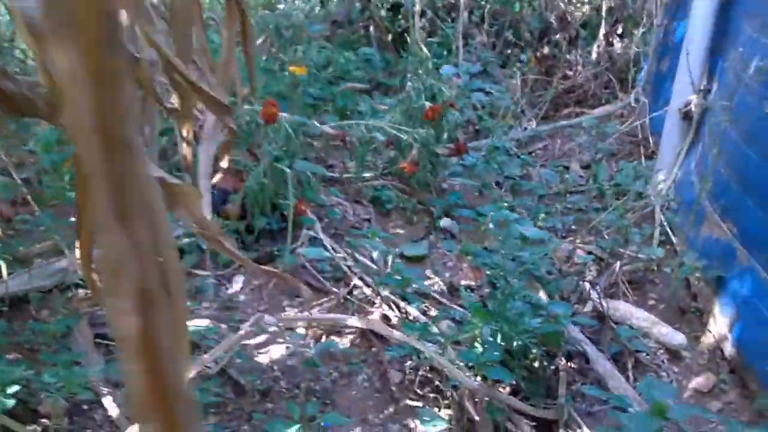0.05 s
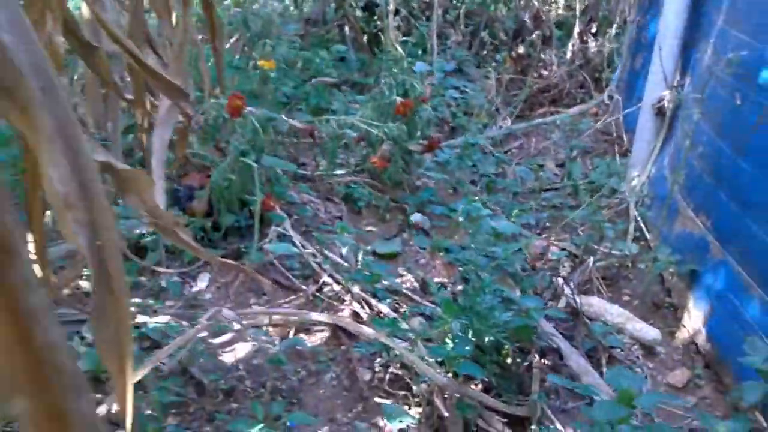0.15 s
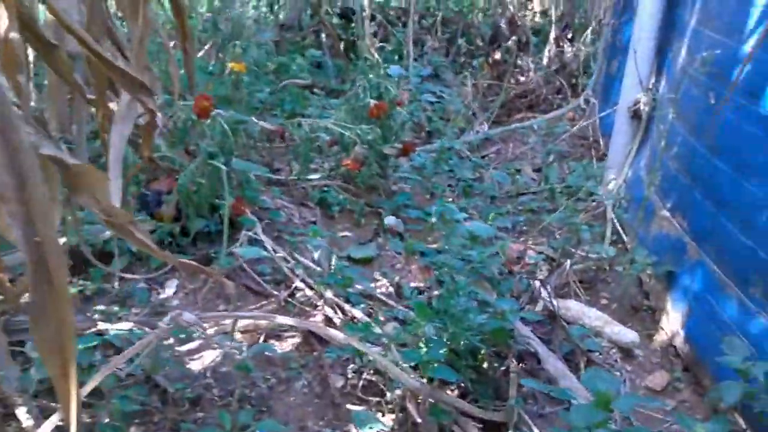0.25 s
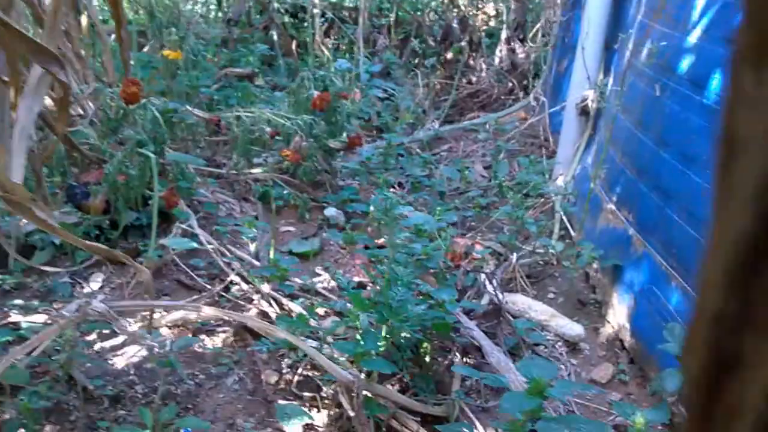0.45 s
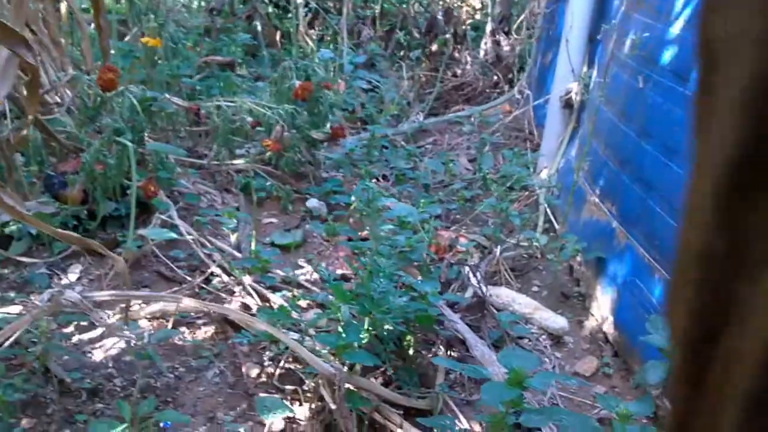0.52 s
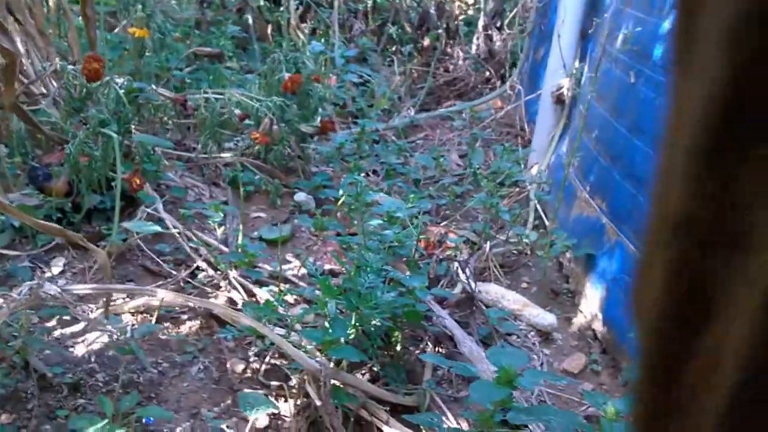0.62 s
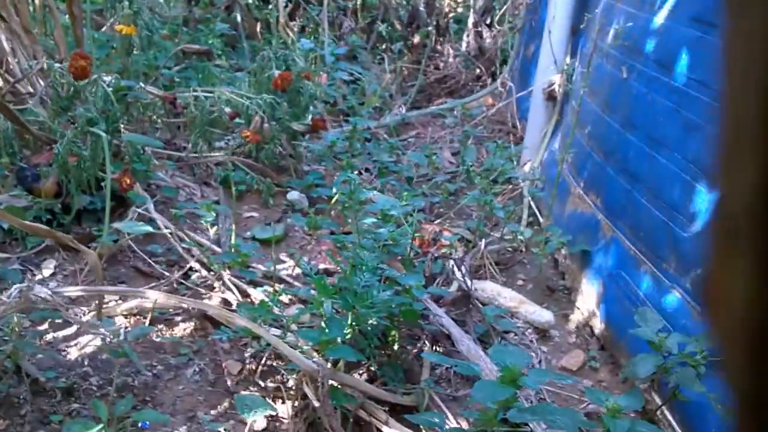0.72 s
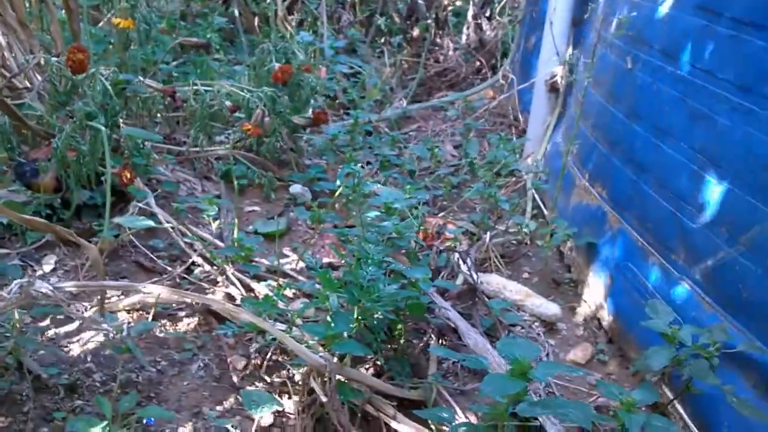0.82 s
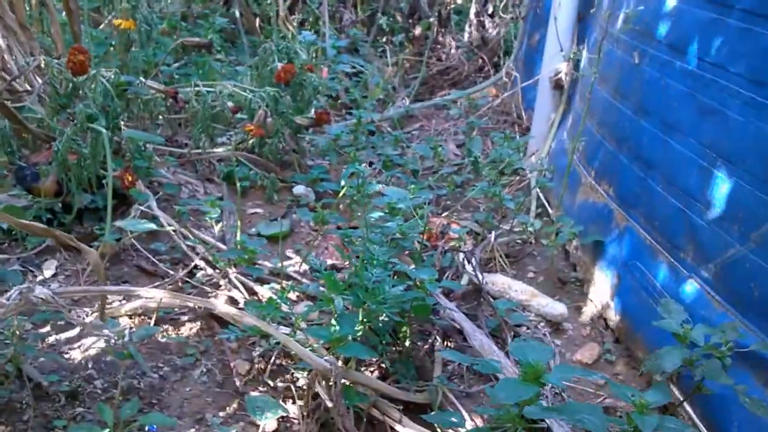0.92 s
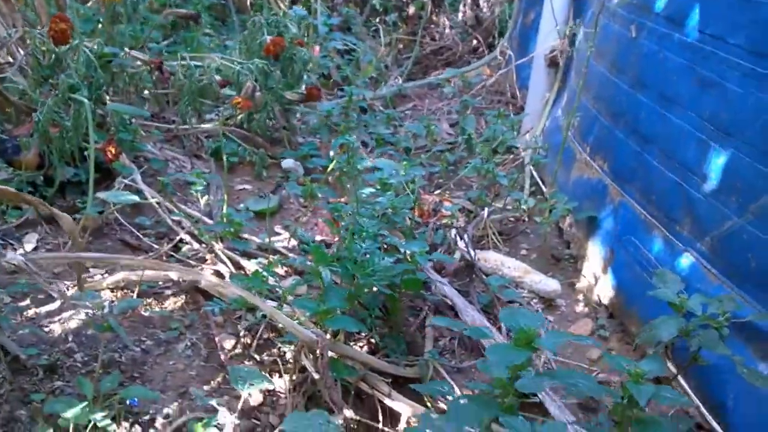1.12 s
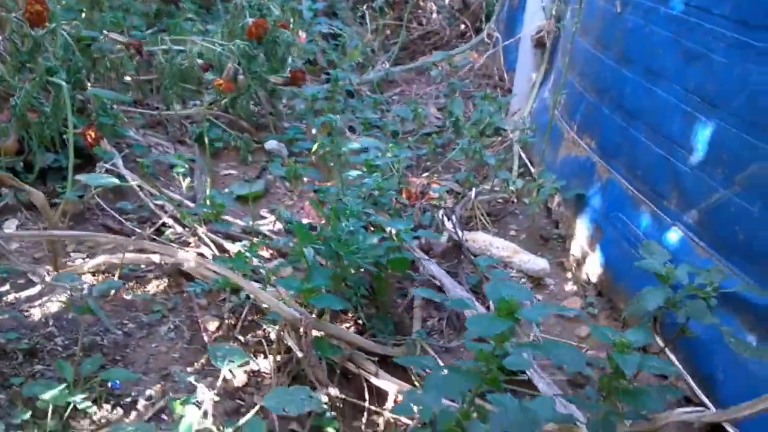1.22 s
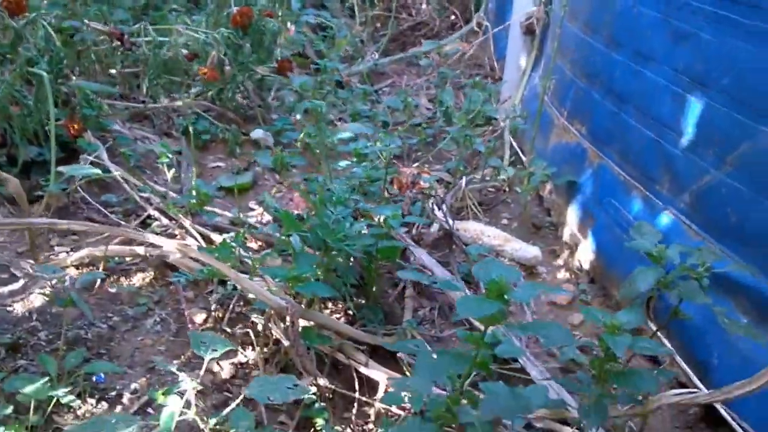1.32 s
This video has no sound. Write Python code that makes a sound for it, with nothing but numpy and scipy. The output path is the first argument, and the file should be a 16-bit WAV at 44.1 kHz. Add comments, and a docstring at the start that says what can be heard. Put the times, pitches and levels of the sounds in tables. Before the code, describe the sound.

A dry corn stalk snaps close by in a garden. Faint rustle, far hush and low wind come first; at 0.2 seconds a sharp, bright crack bursts out with a short tearing hiss, hollow thump and fading splinters. Light leaf crackles follow from 0.27, thicken into a dense cluster around 0.65-1.0 with a soft bump near 0.8, then grow sparse until the end at 1.35. Dry, close, mono.

```python
"""Corn stalk snapping in a garden

A dry corn stalk snaps close by, with a hollow thump, as someone pushes through a garden.
Brittle leaves crackle, mostly in clusters after the snap, over a soft rustle, a far hush and low wind.
The snap and thump are fading sine waves, with noise for the tearing and the splinters.
Leaves are short noise bursts that ring; rustle, hush and wind are noise shaped by tone tables.
"""
import sys
import numpy as np
from scipy import signal
from scipy.io import wavfile
from scipy.ndimage import uniform_filter1d

SR = 44100
rng = np.random.default_rng(int(sys.argv[2]) if len(sys.argv) > 2 else 0)


def voltage_ratio(level):
    """Linear amplitude factor for a level in decibels (scalar or array-like)."""
    return 10 ** (np.asarray(level, float) / 20)


def wav_out(sig):
    """Save sig, one row per channel (or a flat mono array), as 16-bit PCM at SR to the path in sys.argv[1]."""
    wavfile.write(sys.argv[1], SR, np.round(np.clip(np.atleast_2d(sig).T, -1, 1) * 32767).astype(np.int16))


N = 59535

# In all tables t60 is the time to fade by 60 dB. Tone tables give relative levels only.
# far hush, over time: t/s, level/dB
HUSH_LEVEL = [(0, -56), (.15, -54.5), (.3, -56), (.45, -53.5), (.6, -53.5), (.75, -53), (.9, -54),
              (1.05, -54.5), (1.2, -54), (1.35, -53)]
# tone of the hush: f/Hz, level/dB
HUSH_TONE = [(140, -19.5), (230, -3.5), (290, -11.5), (549, -5), (691, -6.5), (826, -2), (1160, -4.5),
             (1620, -8.5), (4010, -30.5), (4960, -21.5), (16000, -45.5)]
# wind rumble, over time: t/s, level/dB
WIND_LEVEL = [(0.0, -53), (0.398, -52), (0.544, -52.5), (0.77, -55.5), (1.192, -52.5), (1.35, -50)]
# tone of the wind: f/Hz, level/dB
WIND_TONE = [(12, -46), (20, -14.5), (99, -0.5), (182, -4), (300, -20.5), (390, -42), (660, -120)]
# how hard the leaves are stirred: t/s, level/dB
STIR_LEVEL = [(0, -58.5), (.1, -62), (.2, -61.5), (.3, -56.5), (.42, -59), (.55, -55), (.63, -61),
              (.68, -57), (.8, -61), (.9, -62.5), (1.0, -60.5), (1.08, -63), (1.15, -64), (1.22, -61.5),
              (1.3, -60.5), (1.35, -63)]
# tone of the smooth rustle: f/Hz, level/dB
RUSTLE_TONE = [(880, -16), (1500, 0), (1830, -18.5), (2390, -4), (3180, -9.5), (5170, -12), (7840, -38),
               (12100, -27), (16000, -36)]
# tone of a leaf's body, for cracks and ticks: f/Hz, level/dB
LEAF_TONE = [(400, -19), (700, -12), (1000, 1.5), (1500, -1.5), (2000, -4.5), (3400, -1), (5500, -6.5),
             (7500, -16), (16000, -52.5)]
# papery treble of cracks and ticks: f/Hz, level/dB
SHEEN_TONE = [(5000, -28), (7000, -6), (11500, 1.5), (14000, -5.5), (16000, -5.5)]
# leaves cracking one by one: t/s, body level/dB, ring f/Hz, treble level/dB
CRACKS = [(0.1063, -54, 2800, -81), (0.1903, -63, 3700, -59), (0.274, -47, 4350, -53),
          (0.2946, -48, 2710, -67), (0.3614, -57, 3270, -74), (0.3756, -45.5, 2470, -59),
          (0.4347, -44, 2240, -55.5), (0.4453, -67, 2240, -59), (0.4493, -56, 2240, -66),
          (0.467, -50, 2200, -69), (0.5164, -50.5, 2760, -57), (0.6453, -52, 2540, -69),
          (0.6491, -46, 3320, -61), (0.6663, -46.5, 3300, -55), (0.6687, -42.5, 3420, -58),
          (0.6945, -51, 3360, -58), (0.7054, -50, 2580, -59), (0.714, -42.5, 2450, -51.5),
          (0.7258, -55, 3530, -54), (0.7441, -43.5, 3450, -51), (0.753, -52, 4480, -62),
          (0.7602, -39.5, 2630, -47), (0.7809, -46, 3860, -55), (0.7841, -44, 3900, -57),
          (0.7947, -47, 3570, -55), (0.8005, -45, 3400, -49.5), (0.8076, -54, 2840, -58),
          (0.815, -50, 3660, -60), (0.8489, -38.5, 3600, -50), (0.8516, -41, 3420, -67),
          (0.8774, -47, 2720, -60), (0.8847, -45.5, 4420, -61), (0.9043, -45.5, 3730, -62),
          (0.9101, -44, 2750, -58), (0.9305, -48, 3420, -61), (0.952, -57, 3270, -64),
          (0.9708, -45.5, 2760, -60), (0.9854, -55, 3300, -59), (0.9977, -48.5, 2710, -69),
          (1.0044, -50, 3750, -56), (1.0106, -53, 3750, -64), (1.0564, -48, 3070, -60),
          (1.093, -53.5, 2840, -63), (1.191, -63, 3010, -59), (1.2257, -55, 4950, -72),
          (1.2769, -45, 4100, -61), (1.2858, -48, 2630, -68), (1.2929, -47, 3700, -62),
          (1.3395, -50.5, 2450, -64), (1.3466, -46.5, 2540, -55)]
# fibres of the stalk breaking one after another: t/s, level/dB
FIBRES = [(.2086, -35), (.2093, -30), (.21139, -22), (.21208, -13), (.21300, -15), (.21392, -14),
          (.21461, -20), (.2167, -21)]
# what the stalk rings with: f/Hz, level/dB (added to the fibre's), t60/s
STALK_MODES = [(876, -13, 0.02), (1226, -18.5, 0.041), (1640, -15.5, 0.015), (2450, -10.5, .012),
               (2663, -4, 0.018), (4350, -3, 0.037), (4950, 5.5, 0.018), (6260, -3.5, 0.0064),
               (7200, -12, 0.0056), (10700, -13, .006)]
# tone of splinters and leaves shaken by the break: f/Hz, level/dB
SPLINTER_TONE = [(240, -13), (400, -11.5), (880, -11.5), (1250, -9.5), (1800, -13.5), (2500, -14.5),
                 (3200, -16.5), (4500, -12.5), (5500, -17), (7000, -22.5), (11600, -26), (16000, -36)]
# tone of the tearing hiss: f/Hz, level/dB
TEAR_TONE = [(1500, -28), (2600, 4), (3300, -31), (4500, -1), (6300, -1.5), (8500, -13), (12000, -15),
             (16000, -20)]
# hollow thump that swells after the break: f/Hz, level/dB, t60/s, rise/s
THUMP_MODES = [(81, -26, .15, 0.016), (126.3, -16, 0.13, 0.01), (180, -17, 0.097, 0.011),
               (271.8, -28, 0.18, 0.013), (299.2, -28, .16, 0.024), (339.4, -25, 0.14, .018),
               (389, -37, 0.19, .02), (431, -40, 0.13, 0.018), (560, -37, .07, 0.0097),
               (642, -38.5, 0.18, 0.01)]
# soft low bumps, as of a foot or hand settling: t/s, level/dB, f/Hz
BUMPS = [(.268, -36.5, 135), (.296, -37, 125), (0.821, -37.5, 100), (0.974, -44, 55)]

# rustle: levels are relative to the stirring
TICKS_PER_S, TICK_SPREAD_DB, TICK_T60_S = 910, 3.5, 0.0077
TICKS_DB, TICK_SHEEN_DB, SHUSH_DB = -4, -15, -0.5
# cracking leaves: a quick burst with a weaker, longer tail
CRACK_T60_S, CRACK_TAIL_DB, CRACK_TAIL_T60_S = 0.013, -12, 0.068
RING_WIDTH_HZ, RING_DB = 370, 14
# snap: once the halves part, the ring above DAMPED_HZ dies faster
GIVE_S, STALK_LOW_HZ = 0.00006, 239
PARTED_S, PARTED_T60_S, DAMPED_HZ = 0.21384, 0.0043, 3000
# shaken splinters: they fade faster from SHAKE_END_S on
SPLINTER_S, SPLINTER_DB, SPLINTER_T60_S = 0.2085, -25, 0.19
SHAKE_RISE_S, SHAKE_END_S, SETTLE_T60_S = 0.004, 0.2347, 0.29  # rise: time for a gain step of 1
# tearing hiss of the break itself
TEAR_S, TEAR_DB, TEAR_T60_S = 0.2114, -19, 0.026
# blunt push of the break
KNOCK_S, KNOCK_DB, KNOCK_HZ, KNOCK_LEN_S = 0.2107, -17.5, 456, 0.0037
# thump: modes below SAG_BELOW_HZ sink in pitch as the stalk falls slack
THUMP_S, THUMP_LEN_S = 0.212, 0.16
SAG_BELOW_HZ, SAG_PER_S = 200, 2.63  # share of the starting pitch lost per second
BUMP_LEN_S = 0.022


def evened(x):
    """Scales a sound to an rms (average strength) of 1."""
    return x / np.sqrt(np.mean(x ** 2) + 1e-20)


def curve(rows):
    """Turns a table of t/s, level/dB into a gain for every sample."""
    s, db = np.transpose(rows)
    return voltage_ratio(np.interp(np.arange(N) / SR, s, db))


def add(mix, s, sound):
    """Adds a sound into the mix, starting at s seconds."""
    part = mix[round(s * SR):][:len(sound)]
    part += sound[:len(part)]


def colour(x, points):
    """Filters by a table of f/Hz, level/dB with minimum phase, so that clicks stay sharp."""
    hz = abs(np.fft.fftfreq(8192, 1 / SR))
    f, db = np.transpose(points)
    log_gain = np.log(voltage_ratio(np.interp(np.log(hz + 1), np.log(f), db, left=-70)))
    # the Hilbert transform finds the phase that belongs to this gain
    taps = np.fft.ifft(np.exp(np.conj(signal.hilbert(log_gain)))).real[:4096]
    return signal.oaconvolve(x, taps / np.linalg.norm(taps))[:len(x)]


def ring(x, hz, width_hz):
    """A resonance of gain 1: it answers most strongly near one pitch."""
    r = np.exp(-np.pi * width_hz / SR)
    return 2 * signal.lfilter([1 - r], [1, -r * np.exp(2j * np.pi * hz / SR)], x).real


def waver(seconds, db):
    """A random gain that drifts: noise smoothed twice, with a spread in dB."""
    size = max(round(seconds * SR), 2)
    smooth = uniform_filter1d(uniform_filter1d(rng.standard_normal(N), size), size)
    return voltage_ratio(db * evened(smooth))


def air():
    """The far hush and the lumpy rumble of wind: two shaped noises with wavering levels."""
    hush = evened(colour(rng.standard_normal(N), HUSH_TONE)) * waver(0.03, db=1.21)
    wind_tone = WIND_TONE + [(600, -70)]  # everything above 600 Hz is held at -70 dB
    wind = evened(colour(rng.standard_normal(N), wind_tone)) * waver(0.02, db=1.5)
    return curve(HUSH_LEVEL) * hush + curve(WIND_LEVEL) * wind


def rustle():
    """A smooth shush of many leaves, with small ticks at random moments in it."""
    happens = rng.random(N) < TICKS_PER_S / SR
    size = voltage_ratio(TICK_SPREAD_DB * np.minimum(rng.exponential(1, N), 5)) * happens
    tick_fade = voltage_ratio(-60 * np.arange(600) / SR / TICK_T60_S)
    ticks = signal.oaconvolve(size, tick_fade)[:N] * rng.standard_normal(N)
    ticks = evened(colour(ticks, LEAF_TONE) + voltage_ratio(TICK_SHEEN_DB) * colour(ticks, SHEEN_TONE))
    shush = rng.standard_normal(N) * waver(0.012, db=1.0)
    shush = evened(colour(shush, RUSTLE_TONE))
    return curve(STIR_LEVEL) * (voltage_ratio(TICKS_DB) * ticks + voltage_ratio(SHUSH_DB) * shush)


def cracks():
    """Each leaf is a burst of tiny fractures with its own ring and a papery sheen on top."""
    t, out = np.arange(3000) / SR, np.zeros(N)
    burst = voltage_ratio(-60 * t / CRACK_T60_S) + voltage_ratio(CRACK_TAIL_DB - 60 * t / CRACK_TAIL_T60_S)
    burst_rms = np.sqrt(np.mean(burst ** 2))
    for s, db, hz, treble_db in CRACKS:
        roughness = voltage_ratio(2.8 * rng.standard_normal(3000))  # uneven strength, sample by sample
        grit = rng.standard_normal(3000) * roughness * burst
        body = colour(grit, LEAF_TONE) + voltage_ratio(RING_DB) * ring(grit, hz, RING_WIDTH_HZ)
        body = evened(body) * burst_rms
        sheen = evened(colour(grit, SHEEN_TONE)) * burst_rms
        add(out, s, voltage_ratio(db) * body + voltage_ratio(treble_db) * sheen)
    return out


def snap():
    """Each breaking fibre rings the stalk; tearing hisses and shaken splinters rattle on as they fade."""
    t, stalk = np.arange(3000) / SR, np.zeros(N)
    hz, mode_db, t60 = np.transpose(STALK_MODES)[:, :, None]
    give = 1 - np.exp(-t / GIVE_S)  # a fibre gives way quickly, not at once
    modes = give * voltage_ratio(mode_db - 60 * t / t60) * np.sin(2 * np.pi * hz * t)
    for s, db in FIBRES:
        since_parted = np.maximum(t + s - max(s, PARTED_S), 0)
        damp_db = -60 * since_parted / PARTED_T60_S * (hz > DAMPED_HZ)
        add(stalk, s, (voltage_ratio(db + damp_db) * modes).sum(axis=0))
    stalk = signal.lfilter(*signal.butter(2, STALK_LOW_HZ, "high", fs=SR), stalk)

    t = np.arange(N) / SR
    fade_db = -60 * (t - SPLINTER_S) / SPLINTER_T60_S
    fade_db = fade_db - 60 * np.maximum(t - SHAKE_END_S, 0) / SETTLE_T60_S
    rise = np.clip(0.28 + (t - SPLINTER_S) / SHAKE_RISE_S, 0, 1) * (t > SPLINTER_S)
    shake = rise * voltage_ratio(SPLINTER_DB + np.minimum(fade_db, 0))
    tear = (t > TEAR_S) * voltage_ratio(TEAR_DB - 60 * np.maximum(t - TEAR_S, 0) / TEAR_T60_S)
    grit = rng.standard_normal(N) * waver(0.001, db=2.2)
    splinters = shake * colour(grit, SPLINTER_TONE)
    hiss = tear * colour(grit[::-1], TEAR_TONE)  # backwards, so it does not match the splinters
    return stalk + splinters + hiss


def thump():
    """A blunt knock, low modes that swell and die, and a few soft bumps."""
    out = np.zeros(N)
    t = np.arange(0, KNOCK_LEN_S, 1 / SR)
    hump = np.sin(np.pi * t / KNOCK_LEN_S) ** 2
    knock = hump * np.cos(2 * np.pi * KNOCK_HZ * (t - KNOCK_LEN_S / 2))
    add(out, KNOCK_S, -voltage_ratio(KNOCK_DB) * knock)

    t = np.arange(0, THUMP_LEN_S, 1 / SR)
    for hz, db, t60, rise in THUMP_MODES:
        sag = (hz < SAG_BELOW_HZ) * SAG_PER_S
        turns = hz * t * (1 - sag * t / 2)
        swell = 1 - np.exp(-(t / rise) ** 2)
        add(out, THUMP_S, swell * voltage_ratio(db - 60 * t / t60) * np.sin(2 * np.pi * turns))

    t = np.arange(0, BUMP_LEN_S, 1 / SR)
    for s, db, hz in BUMPS:
        add(out, s, voltage_ratio(db) * np.sin(np.pi * t / BUMP_LEN_S) * np.cos(2 * np.pi * hz * t))
    return out


def scene():
    """All the sounds added together, as one channel."""
    return (air() + rustle() + cracks() + snap() + thump())[None]


def top_cut(x):
    """Nothing passes above the cut-off."""
    return signal.sosfilt(signal.butter(12, 16830, fs=SR, output="sos"), x)


def record(dry):
    """Limits the treble to 16 kHz with a steep low-pass filter and finishes the mix."""
    low_pass = signal.firwin(255, 16000, window=("kaiser", 5), fs=SR)
    mix = signal.oaconvolve(dry, low_pass[None], "same")
    return top_cut(mix)


dry = scene()
out = record(dry)
wav_out(out)
```